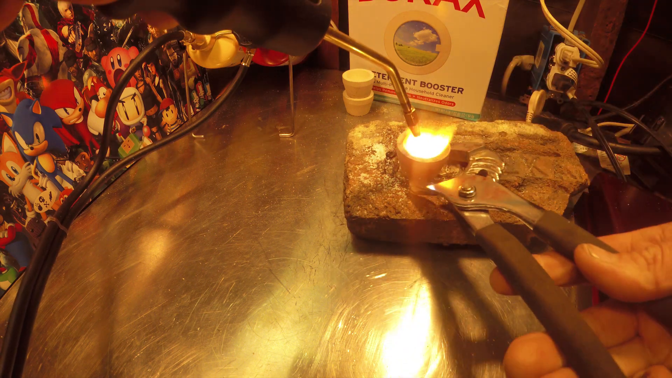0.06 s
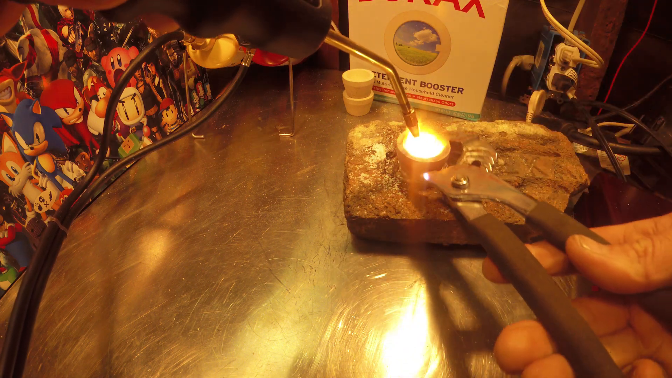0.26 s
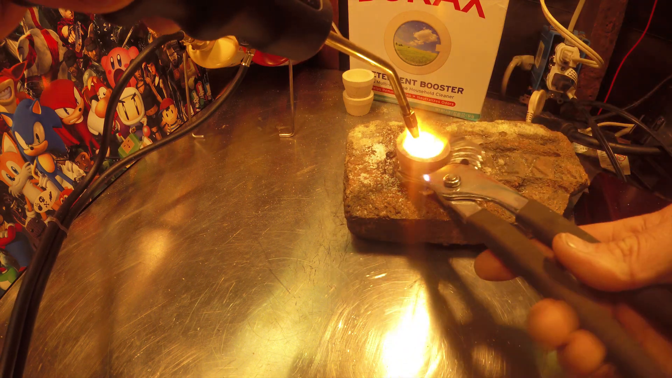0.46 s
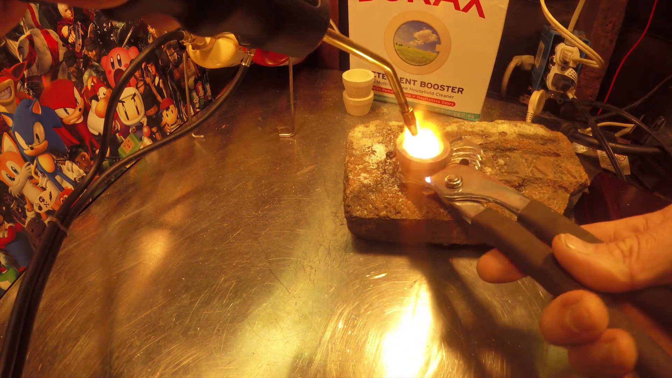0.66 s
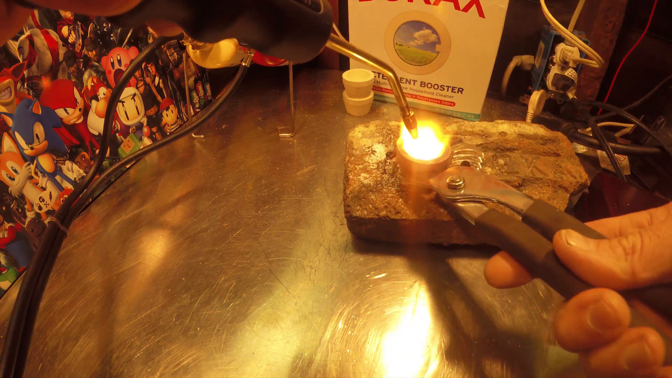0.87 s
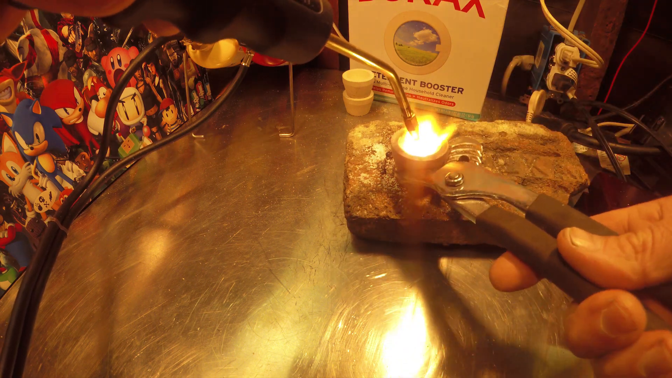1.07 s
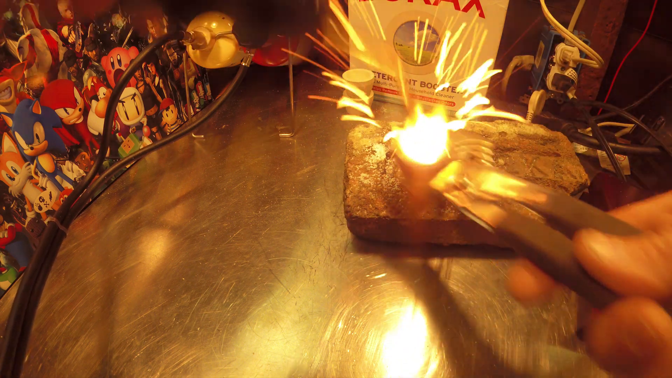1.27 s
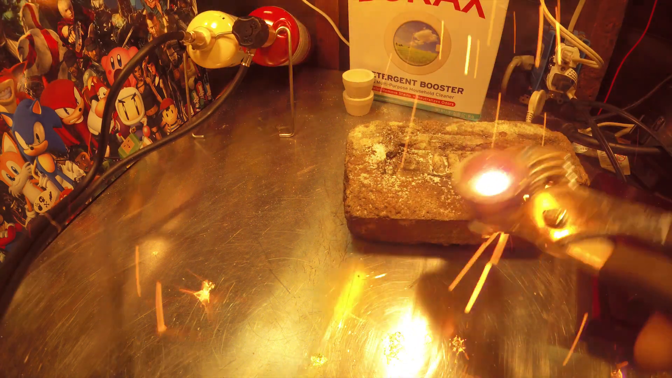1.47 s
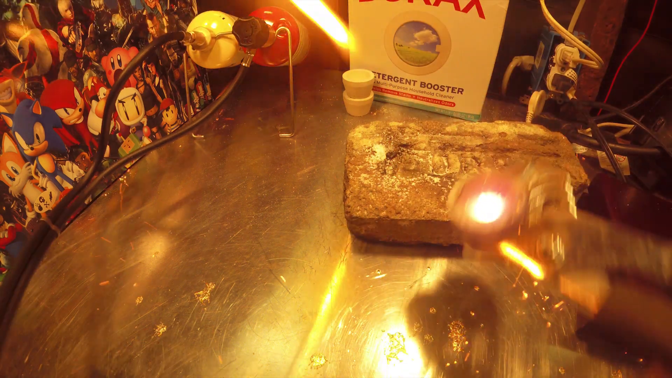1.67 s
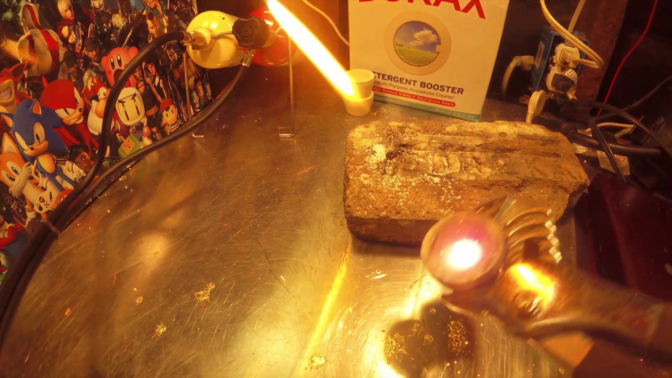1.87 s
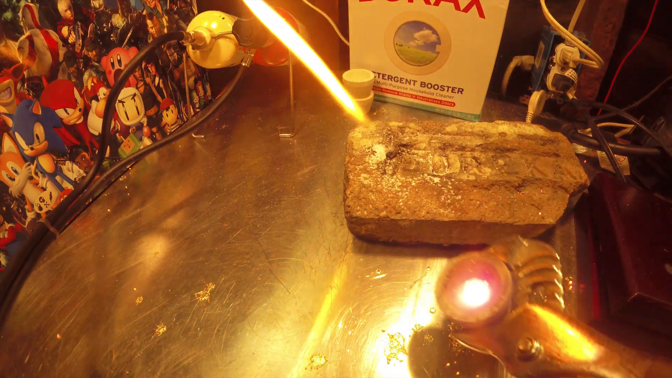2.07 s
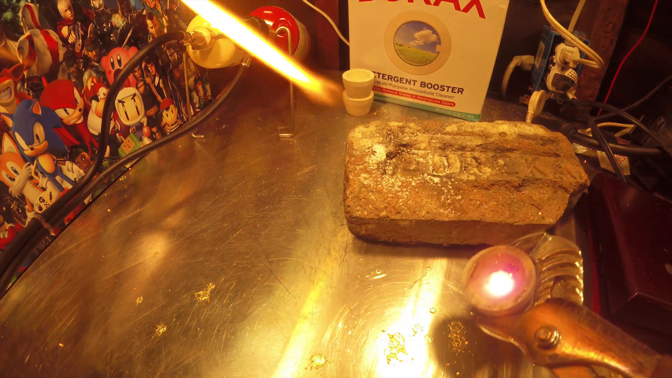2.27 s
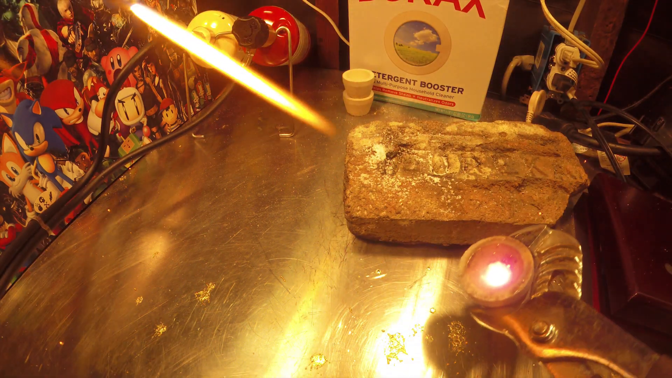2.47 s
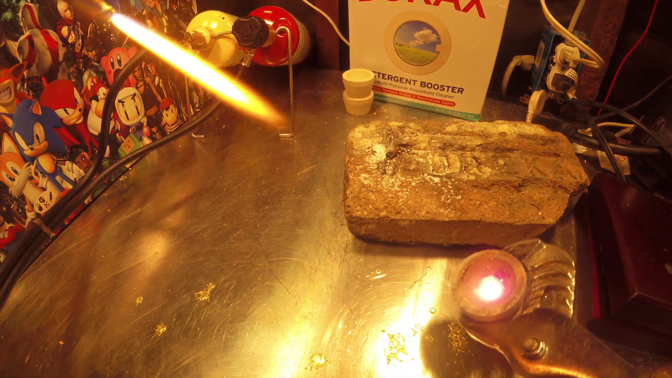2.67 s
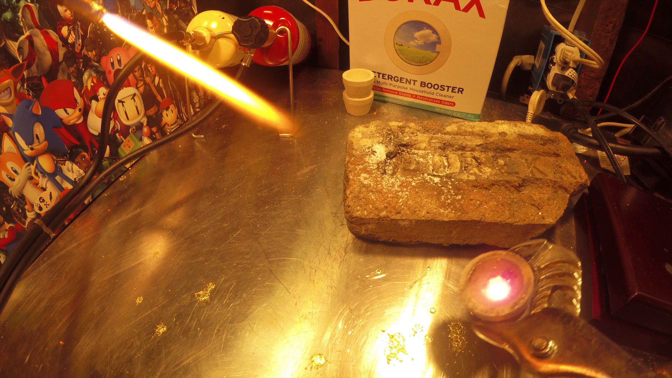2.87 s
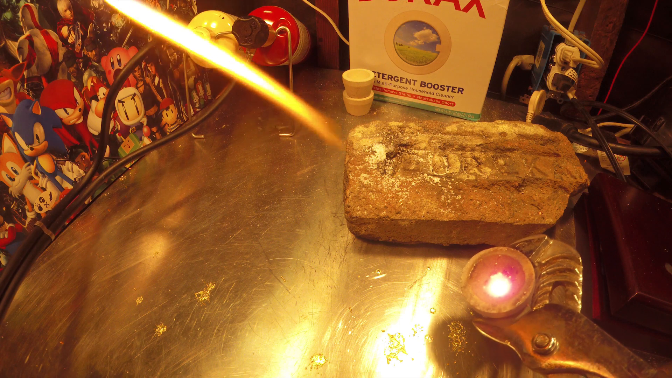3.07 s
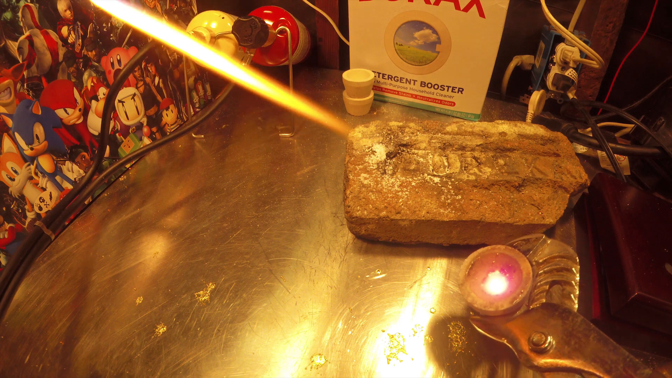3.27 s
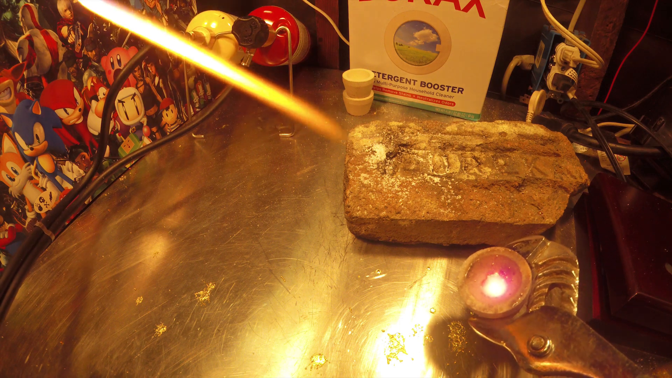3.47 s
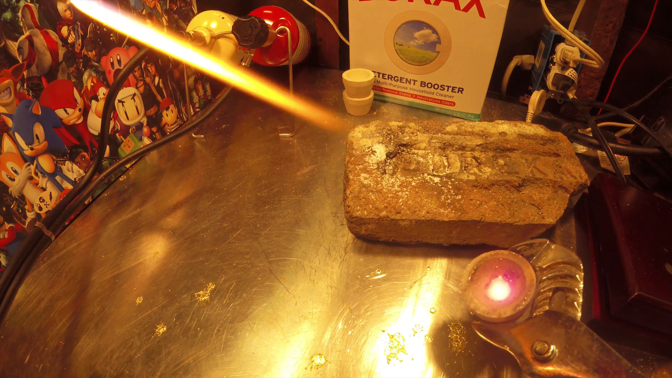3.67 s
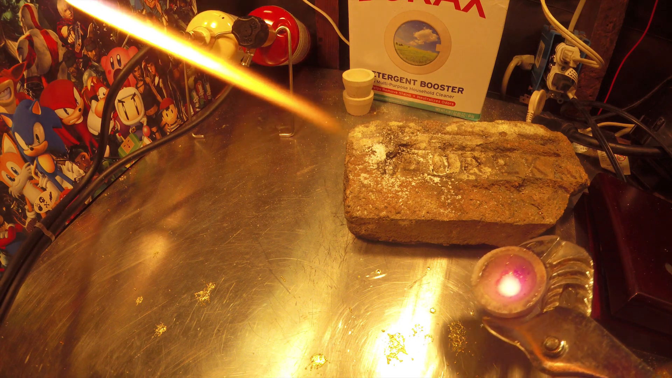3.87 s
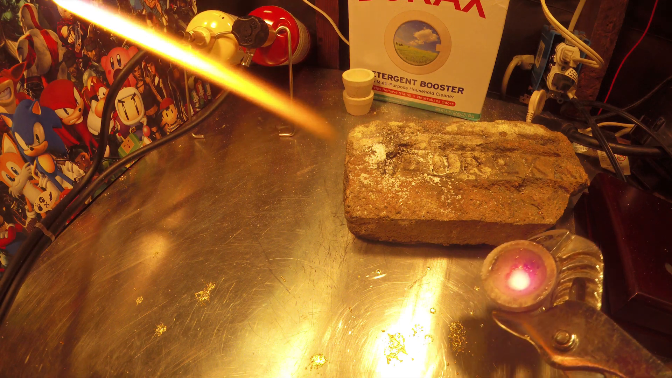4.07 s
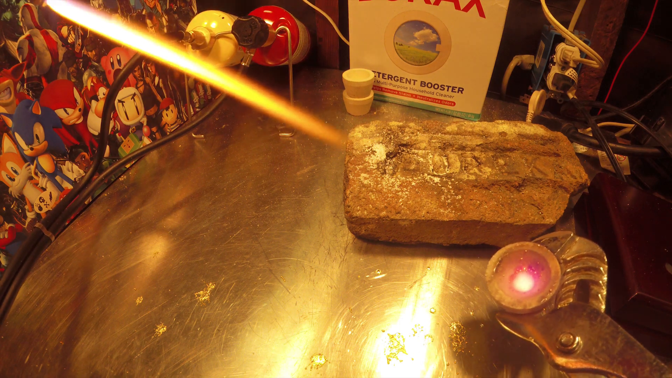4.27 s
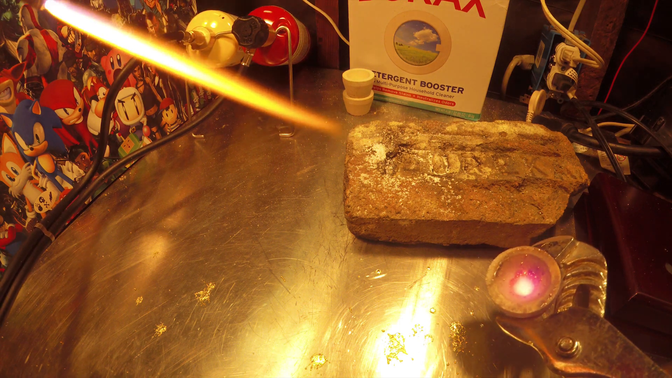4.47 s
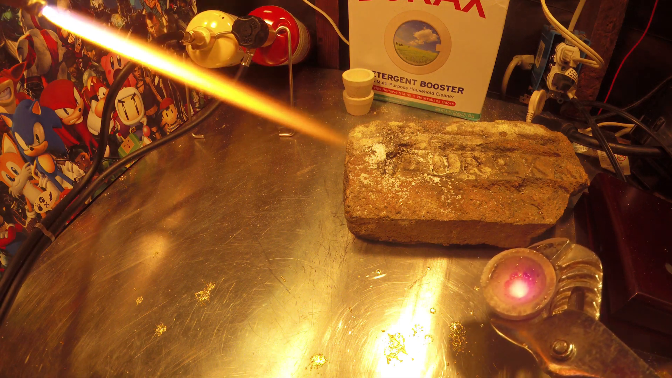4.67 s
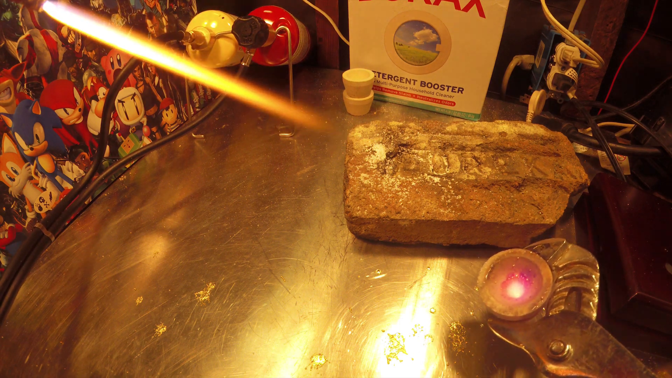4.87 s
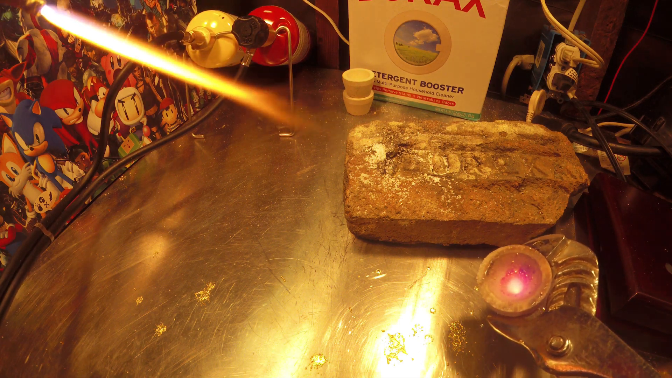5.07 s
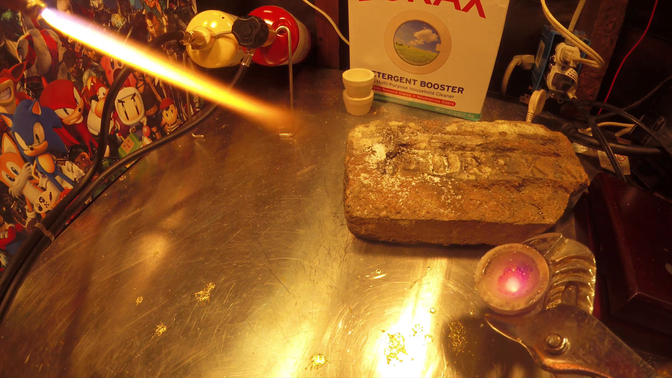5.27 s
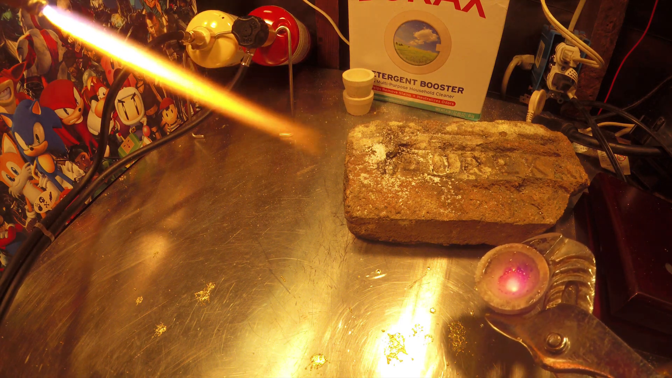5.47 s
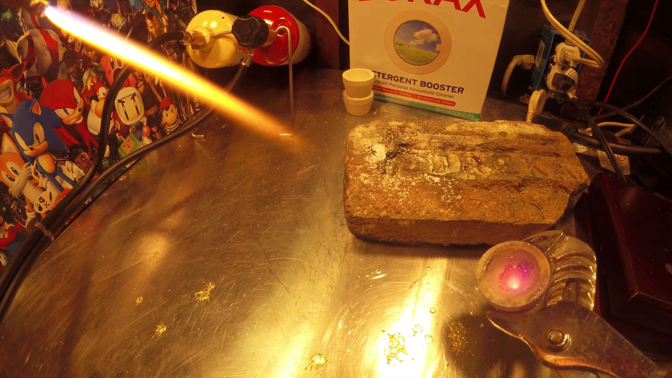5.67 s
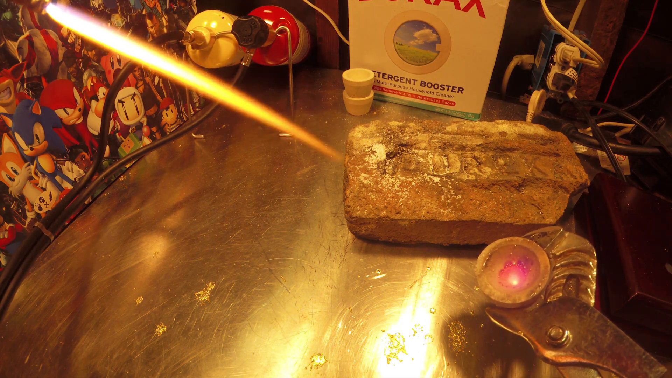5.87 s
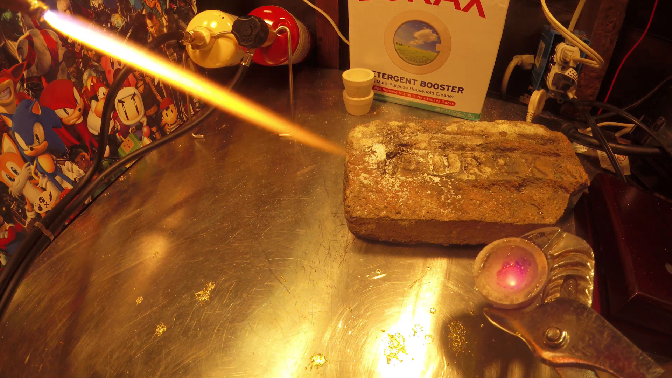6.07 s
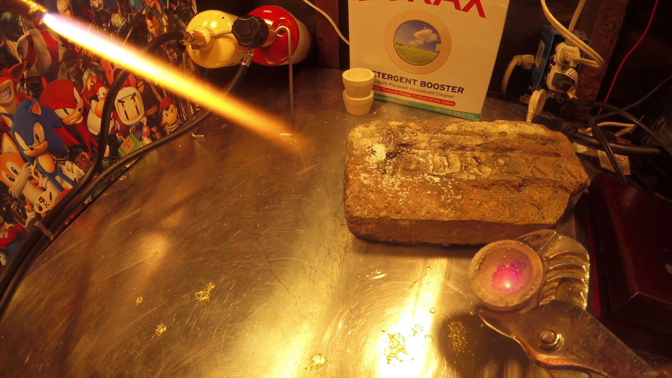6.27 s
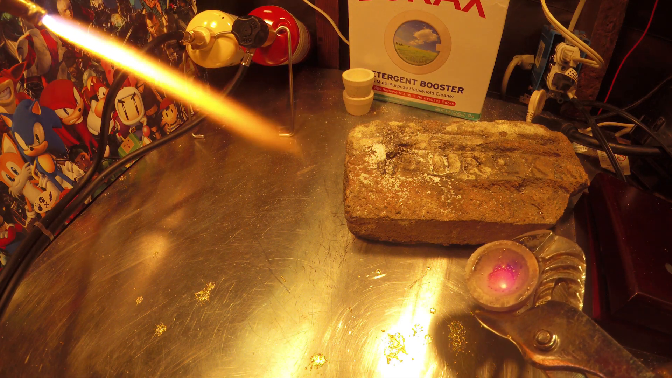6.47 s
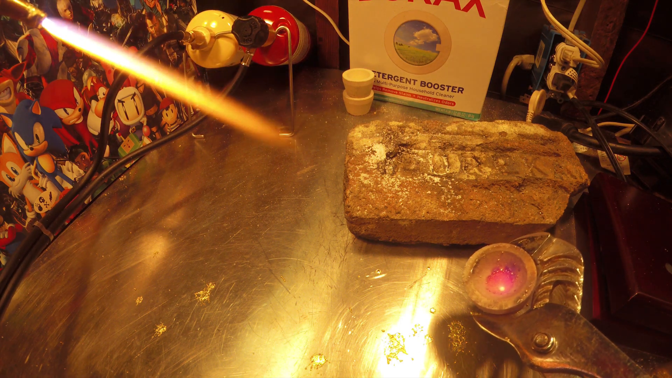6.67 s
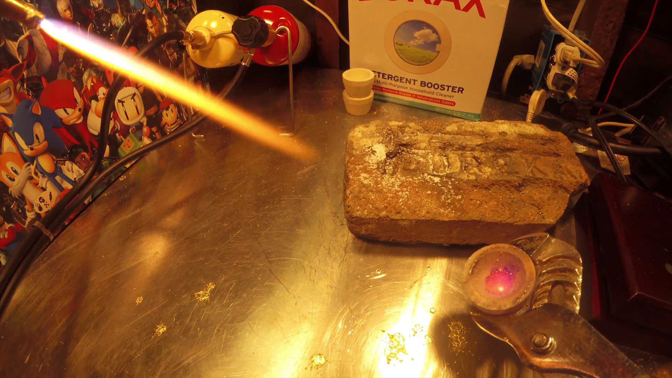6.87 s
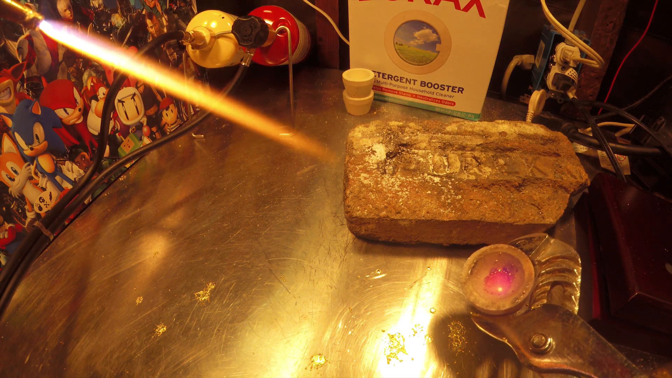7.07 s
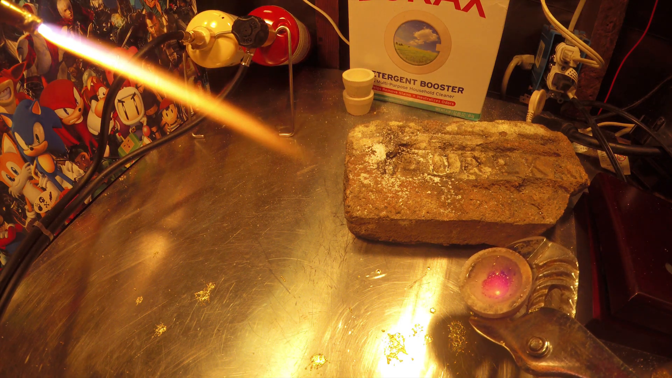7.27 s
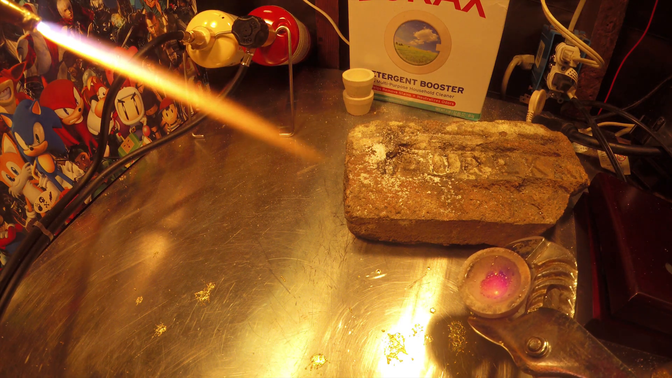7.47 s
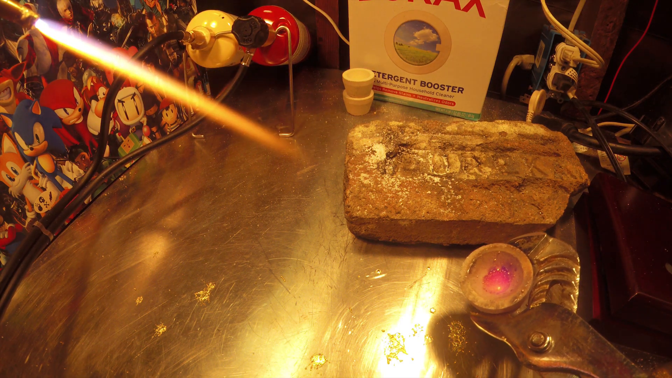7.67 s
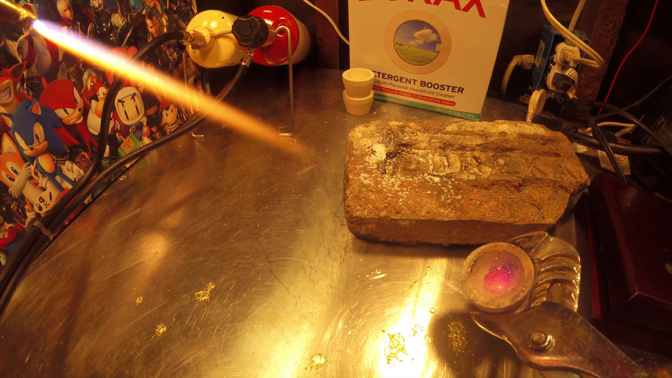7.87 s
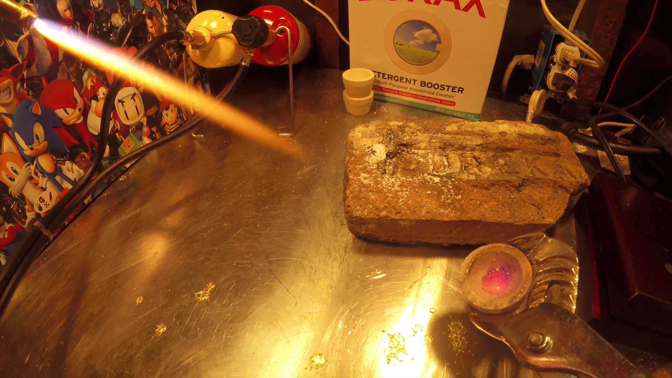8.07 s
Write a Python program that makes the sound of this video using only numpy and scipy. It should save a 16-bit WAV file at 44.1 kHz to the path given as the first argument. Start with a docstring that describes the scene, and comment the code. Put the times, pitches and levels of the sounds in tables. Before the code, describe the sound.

From 0 seconds a gas torch plays into a small crucible: a soft, steady, fluttering hiss, mostly mid and upper-mid, with little bass. Faint sputters of the melt come near 0.5 and 1.0 seconds. At about 1.13 seconds quick bright spits crackle, then a very loud, sharp pop bursts at 1.18, followed by a smaller one at 1.22, both dry with a tiny slap of echo and overload grit. The hiss is pushed down for a moment, with slight sputters until 1.4. Small dull knocks tick at 1.45 and around 1.55 to 1.65 as the crucible is pulled away. From 1.7 to 2.6 the torch hiss swells, brighter and airier, with quick sweeping, phasing colour. It then rushes on almost evenly to 8 seconds, slowly shifting and easing slightly. Close microphone, small cluttered workshop, very short reverberation, extremely faint hum and wavering tone beneath.

```python
"""A gas torch hisses into a small crucible on a steel bench: fluttering noise, coloured and levelled.
The melt sputters and spits (decaying noise), then blows out in a double pop that makes a limiter duck.
Dull knocks (struck, band-limited noise) follow as the crucible is pulled away.
The lifted torch roars on in open air, its hiss swept by delayed copies and gliding bands.
Faint beneath: steady low tones, a wavering note and the scatter of a cramped workshop."""
import sys
import numpy as np
from scipy import signal
from scipy.fft import rfft, irfft
from scipy.io import wavfile
from scipy.ndimage import uniform_filter1d, minimum_filter1d, map_coordinates

SR = 44100
rng = np.random.default_rng(int(sys.argv[2]) if len(sys.argv) > 2 else 0)


def to_wav(sig):
    """Store sig (one row per channel, or 1-D mono) as 16-bit WAV at the path in sys.argv[1].

    Samples outside -1..1 are clipped; the rate is SR.
    """
    pcm = np.clip(np.atleast_2d(sig), -1, 1) * 32767
    pcm = np.round(pcm).astype(np.int16)
    wavfile.write(sys.argv[1], SR, pcm.T)  # frames by channels


N = 358091

# mains hum and a faint steady tone: (frequency [Hz], rms level [dB])
HUM = [(120, -106), (142, -113), (240, -105)]
# swells of the faint note: (time [s], 1/e half length [s], lift [dB])
NOTE_SWELLS = [(2.6, .1, 13), (2.9, 0.086, 10), (4.1, 0.24, 9), (5, .3, 7), (6, 0.4, 10), (6.9, 0.6, 9)]
# decay of the room: (frequency [Hz], time to fall 60 dB [s])
ROOM_T60 = [(300, 0.46), (1500, 0.053), (5000, 0.1), (13000, 0.052)]
# crucible jerked away: (time [s], relative level [dB], centre [Hz], decay time [s])
KNOCKS = [(1.449, -38, 1300, .004), (1.454, -48, 850, .008), (1.47, -48, 1000, .008),
          (1.556, -50.5, 900, .007), (1.564, -43, 1300, .007), (1.635, -44.5, 950, .008)]
# soft sputters of the melt: (time [s], relative level [dB], centre [Hz], decay time [s])
SPUTTERS = [(.476, -37.5, 2242, .012), (.968, -39, 4000, 0.03), (1.106, -34, 3800, .01),
            (1.273, -35, 4200, .002), (1.368, -42, 3450, .015), (1.389, -38, 3450, .016)]
# gas bursting out of the melt: (time [s], relative level [dB], decay time [s], treble lift [dB])
SPITS = [(1.1283, -11.5, .0006, 5), (1.1297, -14.5, .0016, 1), (1.1325, -9.5, .0008, -1),
         (1.1625, -28.5, .004, -5), (1.1653, -21, .001, -4), (1.171, -17.5, .004, -4),
         (1.2125, -29, .0028, -3)]
# spectrum of a spit: (frequency [Hz], relative level [dB])
SPIT_COLOUR = [(60, -73), (400, -55), (1000, -24), (2000, -3), (2850, -15), (3700, 4), (4500, 0),
               (5500, -5), (7200, -8), (9800, -8), (10900, 6.5), (13200, 0), (14200, -21), (16000, -34)]
# spectrum of the blow-out: (frequency [Hz], relative level [dB])
BLOWOUT_COLOUR = [(40, -70), (300, -58), (650, -29), (950, -15), (1250, 0), (2400, 4), (2900, 0), (3300, 5),
                  (4500, 2), (6250, 5.5), (7100, -6), (8000, 0), (9300, -7), (11500, -4), (13000, -11),
                  (15500, -29)]
# spectrum of the smaller pop after it: (frequency [Hz], relative level [dB])
AFTERPOP_COLOUR = [(40, -50), (300, -39), (600, -26), (950, -7), (1350, -.5), (2350, .5), (2950, -12),
                   (3900, -5), (5000, -7), (6200, -4), (7200, -19), (9000, -14), (11500, -8), (13000, -13),
                   (15500, -38)]
# pops: (time [s], level before limiting [dB], echo lag [ms], echo level [dB], spectrum)
POPS = [(1.1764, 14, 6.2, -10, BLOWOUT_COLOUR), (1.2189, 6.5, 4, -14, AFTERPOP_COLOUR)]
# flame inside the crucible: (frequency [Hz], relative level [dB])
IN_CRUCIBLE = [(40, -66), (150, -52), (260, -39), (340, -33.6), (500, -27), (850, -10.5), (1400, -2.5),
               (2400, -0.5), (3100, -8), (4200, -6.5), (6300, -5.5), (7100, -22), (11000, -31.5),
               (13600, -38), (15000, -49.0)]
# flame in open air: (frequency [Hz], relative level [dB])
IN_AIR = [(40, -69), (180, -54.5), (260, -48), (330, -34), (480, -34.5), (650, -21.5), (850, -15),
          (1350, -6), (2300, -2), (4000, -2.04), (5200, -7), (6250, -6.5), (6800, -15), (9500, -18),
          (11200, -19.5), (13000, -26), (13600, -30), (15000, -53)]
# fixed resonances of the nozzle and surroundings: (centre [Hz], width [Hz], lift [dB])
RESONANCES = [(874, 87, 3.3), (1540, 134, 4.3), (1834, 181, 2.2), (1965, 98, -0.4), (2191, 158, 2.1),
              (2648, 113, 4.4), (2810, 176, -1.5), (3167, 174, 1.4), (3527, 145, 1.7), (3695, 175, 4.3),
              (3903, 105, -1.6), (4286, 150, 4.1), (4708, 103, 1.6), (6205, 297, 4.5), (6361, 126, 2.9),
              (6613, 169, -3.2), (6845, 162, 2.1), (8007, 692, 2.7), (11079, 688, 4.1)]
# flame level, sinking at the blow-out, swelling as the torch turns: (time [s], relative level [dB])
LOUDNESS = [(0, -39.5), (.9, -39), (1.15, -39), (1.26, -42), (1.5, -43.5), (1.72, -42), (2, -38),
            (2.25, -36.5), (2.6, -34), (3.4, -34.5), (5.2, -35.5), (6.7, -36.5), (7.3, -36), (8.1, -37)]
# hand jerks up at the pop, drops back, lifts the torch and slowly tires: (time [s], rise [cm])
RISE = [(1.1, -0.22), (1.35, 4.57), (1.5, 3.54), (1.65, 0.48), (1.8, -0.39), (2.05, 0.19), (2.3, 0.01),
        (2.7, 0.32), (3.2, 1.88), (4.0, 2.58), (5.0, 2.43), (6.0, 1.77), (7.0, 1.47), (8.1, 0.95)]
# reflections off bench, brick and clutter: (detour [cm], detour per rise [cm/cm],
# added detour at full swing [cm], signed strength [ratio], strongest at [s], 1/e half length [s])
REFLECTIONS = [(9.75, -0.53, 16.24, 0.1, 2.7, 3.05), (11.9, -0.54, 18.55, 0.36, 2.1, 0.14),
               (26.7, 1.14, 1.02, 0.25, 3.5, 5.16), (35.85, 0.51, 11.8, 0.13, 2.48, 2.63),
               (38.65, 1.51, -4.51, -0.13, 4.56, 2.3), (43.99, -0.12, 6.03, -0.18, 3.07, 1.13),
               (49.31, 0.76, -6.39, -0.16, 2.63, 0.51), (53.61, 2.0, 1.1, 0.24, 6.27, 3.61),
               (58.94, 0.98, -3.34, 0.2, 2.71, 0.9), (61.87, 1.45, 1.61, 0.1, 2.87, 3.51),
               (65.11, 0.11, 2.41, -0.12, 1.22, 2.36), (69.21, 1.71, 1.04, -0.11, 6.46, 2.94)]
# bands lifted or cancelled as the torch moves:
# (centre at rest [Hz], width [Hz], lift [dB], strongest at [s], 1/e half length [s])
GLIDING_BANDS = [(1948, 289, -5.0, 1.49, 0.31), (2463, 212, 3.4, 3.0, 2.37), (2970, 373, 11.6, 1.99, 0.19),
                 (3174, 442, -4.3, 1.76, 0.47), (4050, 562, 2.5, 2.41, 0.54), (4449, 315, -7.6, 2.41, 0.93),
                 (4730, 200, 3.3, 7.3, 1.2), (4991, 485, 4.8, 1.65, 0.12), (5390, 364, 7.4, 2.0, 0.53),
                 (6020, 1124, -7.2, 1.54, 0.15), (6327, 532, -6.9, 3.01, 0.35),
                 (6398, 537, -12.3, 2.35, 0.42), (7263, 887, -9.7, 2.48, 0.27),
                 (7325, 1470, 6.4, 2.19, 0.97), (8983, 318, 7.6, 2.09, 0.45),
                 (10695, 316, -4.6, 3.25, 0.65), (12328, 268, -5.7, 2.86, 0.17)]

TIME = np.arange(N) / SR
NOTE_HZ, NOTE_SAG_HZ, NOTE_DB = 377, 4, -91.5
# the louder the jet, the brighter: tilt at the reference level, and its growth
REFERENCE_DB, TILT_DB_PER_OCTAVE, TILT_DB_PER_OCTAVE_PER_DB = -35, -0.2, 0.1
# share of the flame playing into the crucible, and how it slips off
AIM_SHARE, SLIP_S, SLIP_TIME_S = 0.74, 0.86, 0.18
SWING_S, SWING_TIME_S = 1.8, 0.68
THROWN_FROM_HZ, THROWN_UP_TO_HZ = 1400, 12000
SOUND_CM_PER_S = 34300
# longer paths lower the gliding bands together: share of their pitch lost
SAG_PER_CM, SAG_AT_FULL_SWING = 0.014, 0.073
EDGE_HZ = 15700


def from_db(db):
    """Decibels to a gain."""
    return 10 ** (np.asarray(db) / 20)


def unit(x):
    """Scales to an rms of one."""
    return x / np.sqrt(np.mean(x ** 2) + 1e-20)


def follow(rows, t=TIME):
    """The columns of a curve table at the times t."""
    s, *columns = np.transpose(rows)
    return [np.interp(t, s, column) for column in columns]


def at_hz(points, hz):
    """Reads a spectrum on a log-frequency axis."""
    f, value = np.transpose(points)
    return np.interp(np.log(hz + 1), np.log(f + 1), value)


def add(mix, s, sound):
    """Mixes a sound in at time s."""
    part = mix[round(s * SR):][:len(sound)]
    part += sound[:len(part)]


def band_pass(x, hz, spread):
    """Keeps a band reaching a factor of spread to each side of its centre."""
    band = signal.butter(2, [hz / spread, hz * spread], "band", fs=SR, output="sos")
    return signal.sosfilt(band, x)


def high_pass(x, hz, order=2):
    """Keeps the treble without delaying it."""
    return signal.filtfilt(*signal.butter(order, hz, "high", fs=SR), x)


def click(colour, size=4096):
    """Minimum-phase pulse: the sharpest causal one with this spectrum."""
    hz = abs(np.fft.fftfreq(size, 1 / SR))
    log_gain = np.log(from_db(at_hz(colour, hz)))
    spectrum = np.exp(np.conj(signal.hilbert(log_gain)))
    return np.fft.ifft(spectrum).real[:size // 2]


def wander(rate_hz):
    """Smooth random curve of rms one, with changes up to about this rate."""
    hz = np.fft.rfftfreq(N, 1 / SR)
    spectrum = rfft(rng.standard_normal(N)) / (1 + (hz / rate_hz) ** 2)
    return unit(irfft(spectrum, N))


def swell(s, half_s, t=TIME):
    """A smooth hump of height one around time s."""
    return np.exp(-((t - s) / half_s) ** 2)


def fading(start_s, time_s, t):
    """One until the start, then dying away exponentially."""
    return np.exp(-np.maximum(t - start_s, 0) / time_s)


def hum(waver_hz=0.76, waver_rate_hz=2.4):
    """Steady low sines, and a faint note that wavers, swells and sags slightly flat around 6.2 s."""
    steady = sum(from_db(db) * np.sin(2 * np.pi * (hz * TIME + rng.random())) for hz, db in HUM)
    note_hz = NOTE_HZ - NOTE_SAG_HZ * swell(6.2, 0.9) + waver_hz * wander(waver_rate_hz)
    note = np.sin(2 * np.pi * np.cumsum(note_hz) / SR)
    note_db = NOTE_DB + sum(db * swell(s, half_s) for s, half_s, db in NOTE_SWELLS)
    return np.sqrt(2) * (steady + from_db(note_db) * note)  # sqrt(2): rms to peak


def workshop(x, first_s=0.0028, clutter_db=7, clutter_decay_s=0.028):
    """Dense early scatter from the clutter on the bench, then a short tail that decays by frequency."""
    hz, t, z = signal.stft(rng.standard_normal(SR // 3), SR, nperseg=256)
    decay_db = -60 * t / at_hz(ROOM_T60, hz)[:, None]
    tail = signal.istft(z * from_db(decay_db), nperseg=256)[1]
    t = np.arange(len(tail)) / SR
    tail *= (t > first_s) * (1 + from_db(clutter_db) * np.exp(-t / clutter_decay_s))
    return signal.oaconvolve(x, tail / np.linalg.norm(tail))[:N]


def knocks(spread=1.33, contact=5.4):
    """A sharp contact and a short rattle, dulled to a band around the knock's centre."""
    out = np.zeros(N)
    t = np.arange(SR // 10) / SR
    for s, db, hz, decay_s in KNOCKS:
        blow = np.exp(-t / decay_s) * rng.standard_normal(len(t))
        blow[0] = contact
        knock = band_pass(blow, hz, spread)
        # same energy as decaying noise of unit rms
        knock *= np.sqrt(decay_s * SR / 2) / np.linalg.norm(knock)
        add(out, s, from_db(db) * knock)
    return out


def sputters(spread=1.2):
    """The melt stirs under the flame: quickly dying noise in a narrow band."""
    out = np.zeros(N)
    t = np.arange(SR // 5) / SR
    for s, db, hz, decay_s in SPUTTERS:
        noise = unit(band_pass(rng.standard_normal(len(t)), hz, spread))
        add(out, s, from_db(db) * np.exp(-t / decay_s) * noise)
    return out


def spits(rise_s=0.00012, treble_from_hz=7500, level_db=3.5):
    """Short jets of gas escape from the molten metal, some shriller than others."""
    gas = np.zeros(N)
    t = np.arange(SR // 20) / SR
    for s, db, decay_s, treble_db in SPITS:
        jet = rng.choice([-1., 1.], len(t))
        jet = jet + (from_db(treble_db) - 1) * high_pass(jet, treble_from_hz)
        envelope = np.minimum(t / rise_s, np.exp((rise_s - t) / decay_s))
        add(gas, s, from_db(level_db + db) * envelope * jet)
    ring = click(SPIT_COLOUR)
    return signal.oaconvolve(gas, ring / np.linalg.norm(ring))[:N]


def pops(spray_db=-18, spray_decay_s=0.0011):
    """Each pop is one pressure step with a brief spray of metal and an echo off a wall."""
    out = np.zeros(N)
    t = np.arange(SR // 40) / SR
    for s, db, echo_ms, echo_db, colour in POPS:
        blow = from_db(spray_db) * np.exp(-t / spray_decay_s) * rng.standard_normal(len(t))
        blow[0] = 1
        pulse = click(colour)
        crack = signal.oaconvolve(blow, pulse / abs(pulse).max())
        add(out, s, from_db(db) * crack)
        add(out, s + echo_ms / 1000, from_db(db + echo_db) * crack)
    return out


def swing(t):
    """How far the torch has swung aside, 0 to 1."""
    return 1 - fading(SWING_S, SWING_TIME_S, t)


def mirrored(direct, detour_cm):
    """The sound after a detour whose length keeps changing."""
    arrival = (TIME - detour_cm / SOUND_CM_PER_S) * SR
    return map_coordinates(direct, [arrival], order=3)


def reflections(sound):
    """Each nearby surface returns the hiss by a path that changes as the torch rises and swings."""
    # small surfaces throw back only the short waves, and rough ones scatter the shortest
    thrown = high_pass(sound, THROWN_FROM_HZ, order=1)
    thrown = signal.filtfilt(*signal.butter(2, THROWN_UP_TO_HZ, fs=SR), thrown)
    rise_cm, aside = follow(RISE)[0], swing(TIME)
    out = np.zeros(N)
    for cm, cm_per_rise, swing_cm, strength, s, half_s in REFLECTIONS:
        detour_cm = cm + cm_per_rise * rise_cm + swing_cm * aside
        out += strength * swell(s, half_s) * mirrored(thrown, detour_cm)
    return out


def gliding_bands(hz, t):
    """Lift in dB of bands that sweep up as the hand drops, and sink as the torch swings away."""
    scale = 1 - SAG_PER_CM * follow(RISE, t)[0] - SAG_AT_FULL_SWING * swing(t)
    return sum(db * swell(s, half_s, t) * np.exp(-(2 * (hz - f * scale) / width) ** 2)
               for f, width, db, s, half_s in GLIDING_BANDS)


def turbulence(flutter_db=0.75, flutter_hz=90,
               fizz_from_hz=6500, fizz_flutter_db=2.5, fizz_flutter_hz=170,
               snaps_per_s=700, snap_spread_db=6.5, snap_db=-6, snaps_from_hz=3500):
    """The jet's rush: fluttering noise whose treble flutters most and carries tiny snaps."""
    rush = rng.standard_normal(N)
    fizz = high_pass(rush, fizz_from_hz)
    # small eddies shake the treble alone, large ones the whole rush
    rush = rush - fizz + fizz * from_db(fizz_flutter_db * wander(fizz_flutter_hz))
    rush *= from_db(flutter_db * wander(flutter_hz))
    sizes = from_db(snap_spread_db * np.minimum(rng.exponential(1, N), 3.6))
    snaps = sizes * rng.choice([-1, 1], N) * (rng.random(N) < snaps_per_s / SR)
    snaps = signal.lfilter(*signal.butter(1, snaps_from_hz, "high", fs=SR), snaps)
    return unit(rush) + from_db(snap_db) * unit(snaps)


def flame(pivot_hz=3000, patchy_db=0.5, size=1024):
    """The rush takes its colour from the crucible or the open air, and gains moving reflections."""
    overlap = size - size // 4
    hz, t, z = signal.stft(turbulence(), SR, nperseg=size, noverlap=overlap)
    hz = hz[:, None]
    aim = AIM_SHARE * fading(SLIP_S, SLIP_TIME_S, t)
    colour_db = aim * at_hz(IN_CRUCIBLE, hz) + (1 - aim) * at_hz(IN_AIR, hz)
    louder_db = follow(LOUDNESS, t)[0] - REFERENCE_DB
    tilt = TILT_DB_PER_OCTAVE + TILT_DB_PER_OCTAVE_PER_DB * louder_db
    colour_db += tilt * np.log2(np.maximum(hz, 500) / pivot_hz)
    colour_db += sum(db / (1 + (2 * (hz - f) / width) ** 2) for f, width, db in RESONANCES)
    colour_db += gliding_bands(hz, t)
    # eddies make patches of the spectrum swell and sink
    eddies = uniform_filter1d(rng.standard_normal(z.shape), size=24, axis=0)
    eddies = uniform_filter1d(eddies, size=9, axis=1)
    colour_db += patchy_db * unit(eddies)
    direct = signal.istft(z * from_db(colour_db), nperseg=size, noverlap=overlap)[1][:N]
    sound = direct + reflections(direct)
    sound /= np.sqrt(uniform_filter1d(sound ** 2, size=16384))  # level out, then follow the curve
    return sound * from_db(follow(LOUDNESS)[0])


def scene(flame_db=-0.37, torch_room_db=-18, spit_room_db=-10, pop_room_db=-13):
    """Torch, melt and knocks on the bench, each with its share of the room."""
    torch = from_db(flame_db) * flame() + sputters() + knocks()
    spit, pop = spits(), pops()
    sent = from_db(torch_room_db) * torch + from_db(spit_room_db) * spit + from_db(pop_room_db) * pop
    return (torch + spit + pop + workshop(sent) + hum())[None]


def record(dry, ceiling_db=-8.5, hold_s=0.074, recover_db_per_s=98,
           overload_level=0.9, crackle_from_hz=800):
    """A limiter clamps down at once, holds and recovers; then overload crackle and a band limit."""
    power_db = 10 * np.log10(abs(uniform_filter1d(dry[0] ** 2, size=44)) + 1e-12)
    hold = max(int(hold_s * SR), 1)
    headroom_db = np.minimum(ceiling_db - power_db, 0)
    over_db = -minimum_filter1d(headroom_db, hold, origin=(hold - 1) // 2)
    recovery_db = TIME * recover_db_per_s
    cut_db = np.maximum.accumulate(over_db + recovery_db) - recovery_db
    limited = dry * from_db(-uniform_filter1d(cut_db, size=48))
    overload = np.clip(limited, -overload_level, overload_level) - limited
    crackle = high_pass(overload, crackle_from_hz)
    band_limit = signal.firwin(511, EDGE_HZ, window=("kaiser", 9), fs=SR)
    return signal.oaconvolve(limited + crackle, band_limit[None], "same")


dry = scene()
out = record(dry)
to_wav(out)
```